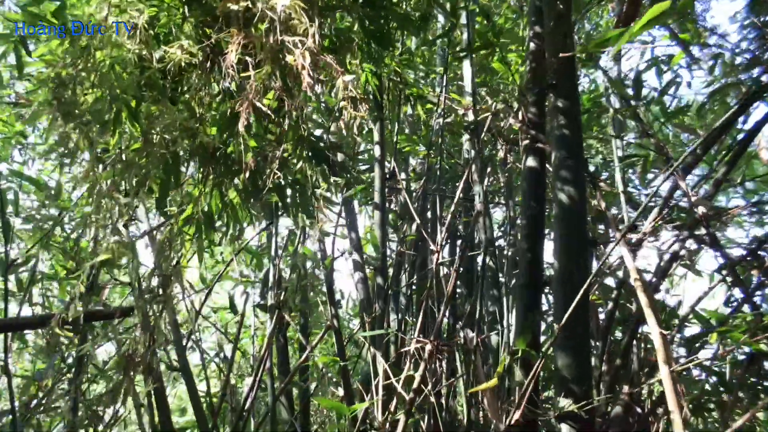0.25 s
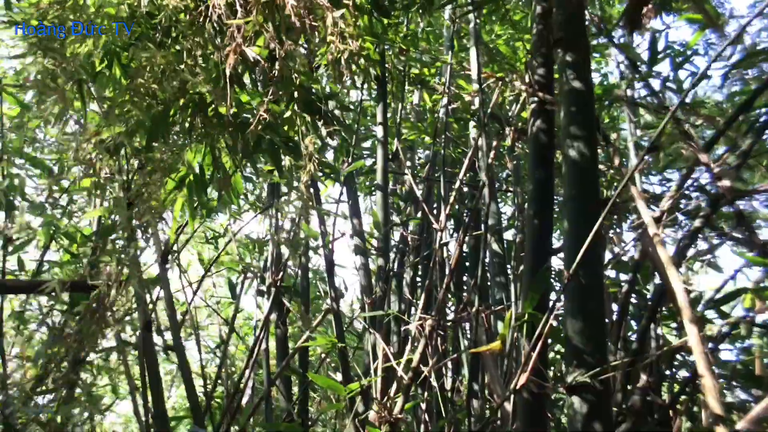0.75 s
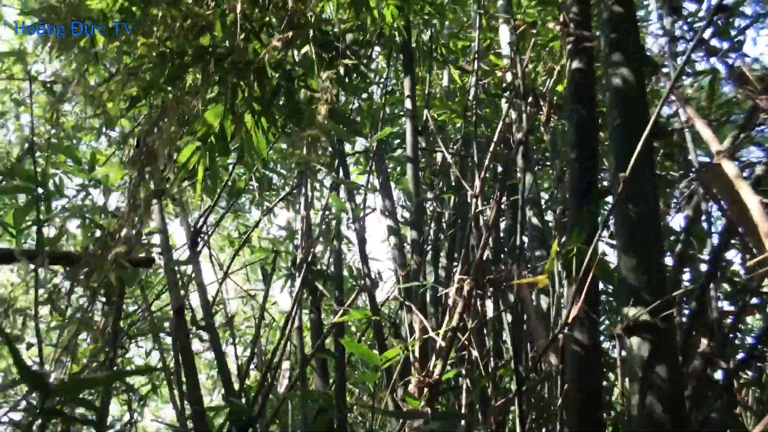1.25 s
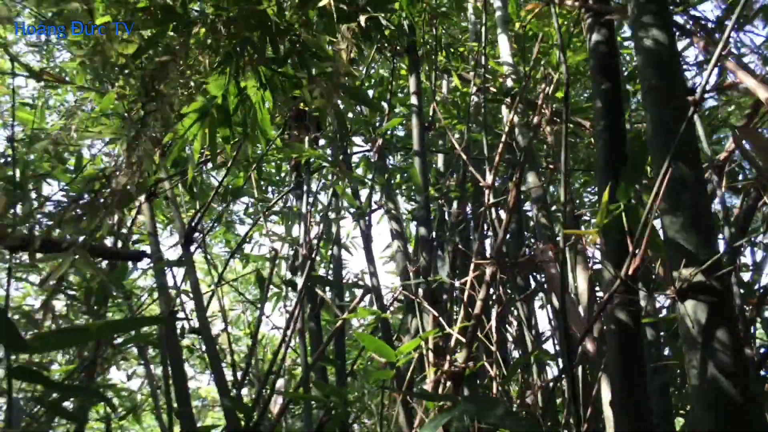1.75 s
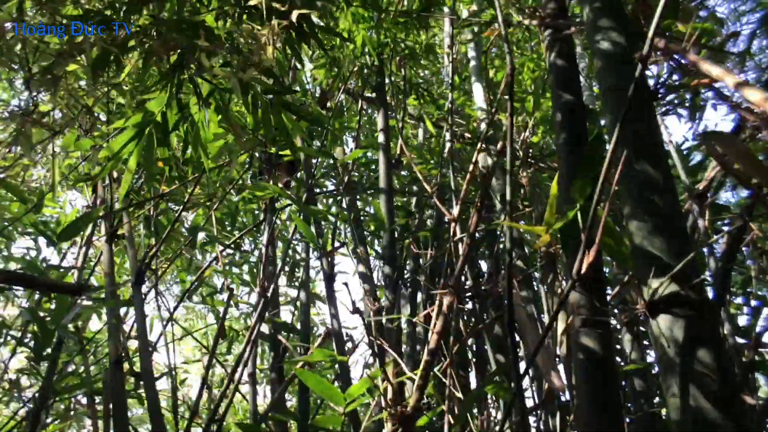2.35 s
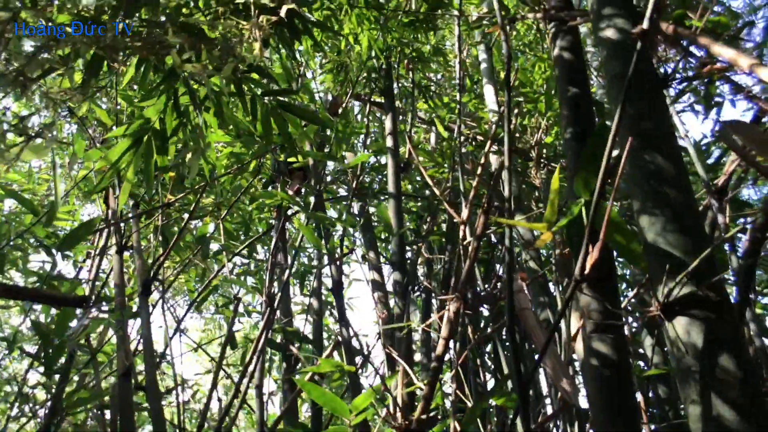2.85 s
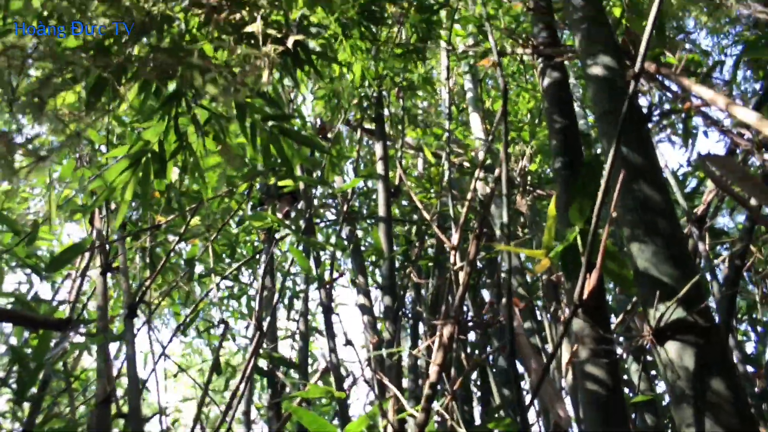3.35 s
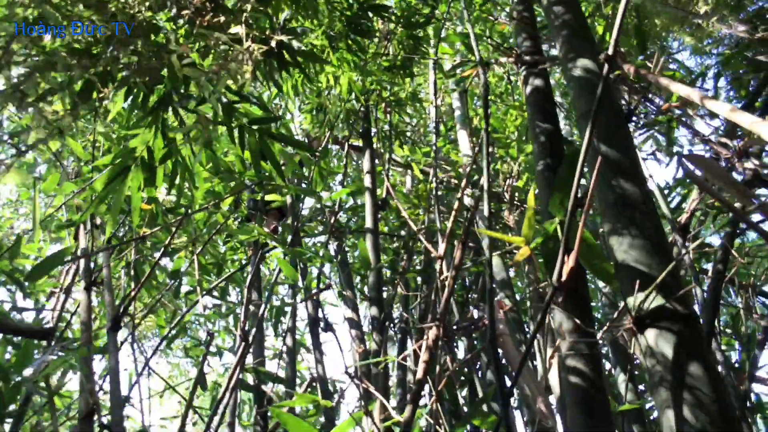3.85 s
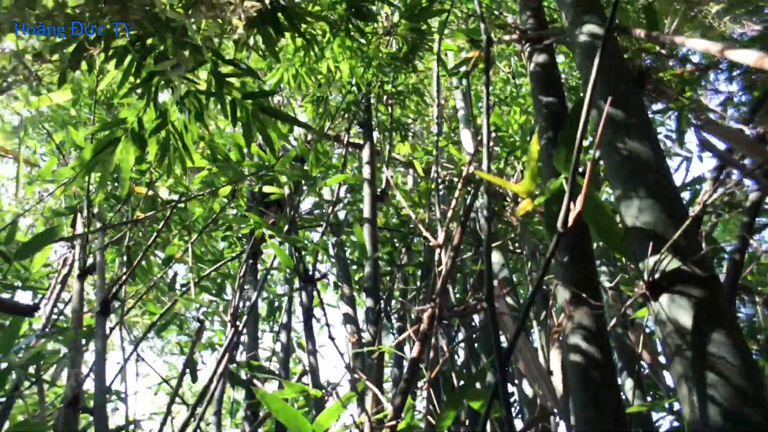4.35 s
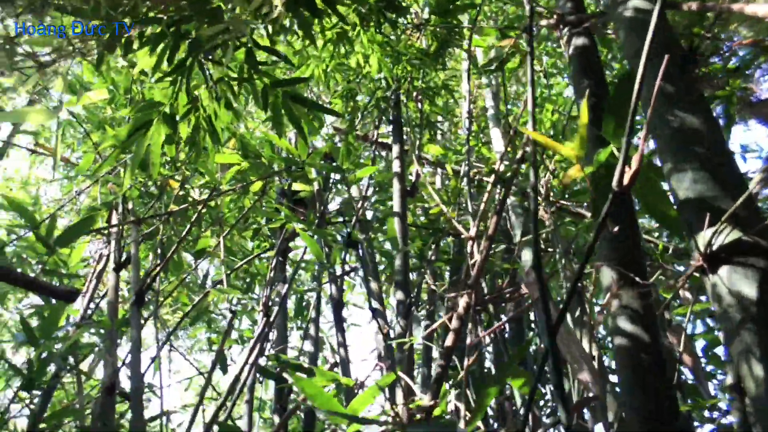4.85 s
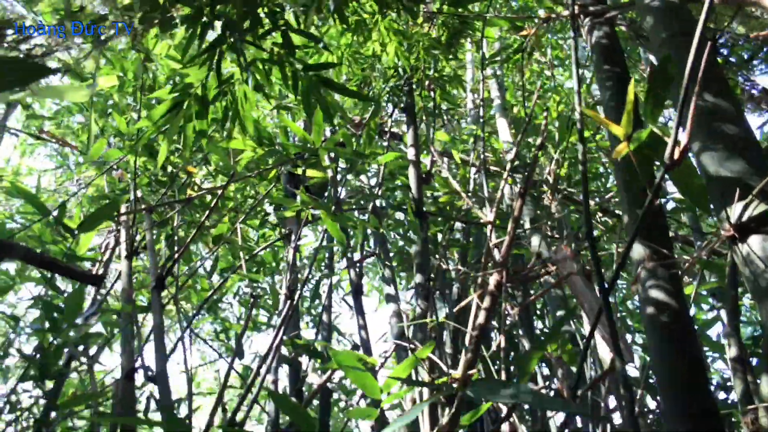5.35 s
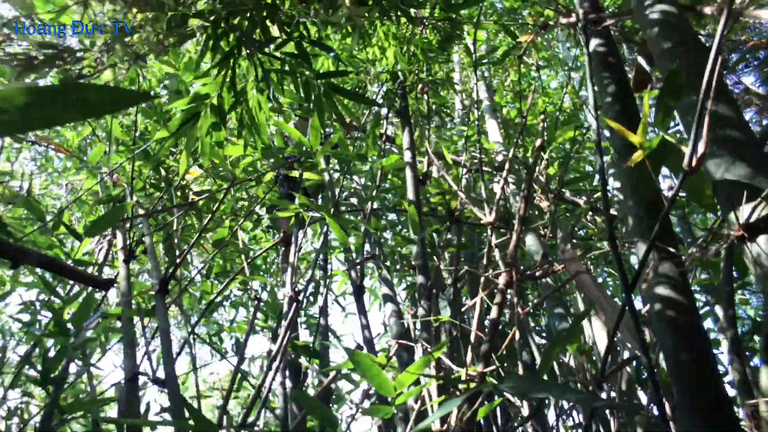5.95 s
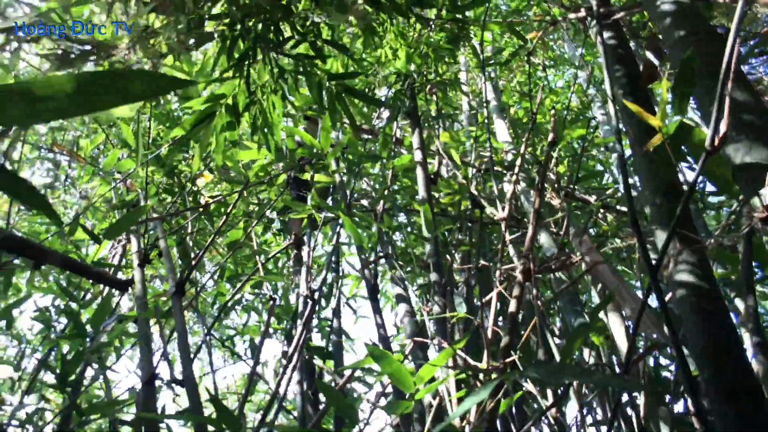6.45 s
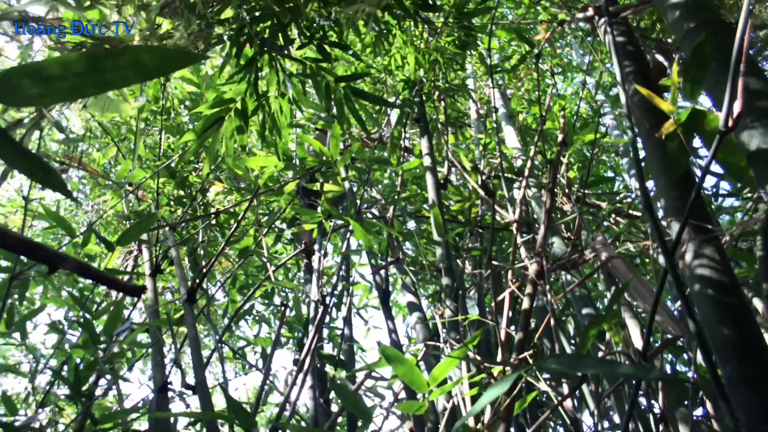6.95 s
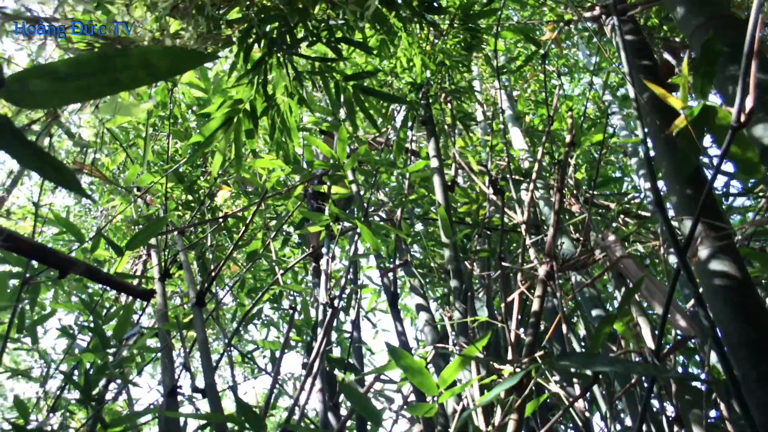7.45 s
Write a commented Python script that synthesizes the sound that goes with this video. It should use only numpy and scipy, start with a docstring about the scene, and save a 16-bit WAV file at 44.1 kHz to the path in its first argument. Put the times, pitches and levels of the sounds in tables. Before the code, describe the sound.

A saw scrapes back and forth through hollow bamboo, its teeth chattering, fibres hissing and blade ringing. Several dry twig cracks come in the first second and a half, with leaf rustles through the first four seconds. Later the sawing gets faster, deeper and more urgent, cutting off mid-action. Outdoors among stems, close mono microphone, short scattered echo, soft bumps and steady faint high insects underneath.

```python
"""Hand saw in a bamboo grove

A hand saw cuts a standing bamboo stem, four strokes a second, then nearly seven as the cut deepens.
Tooth impacts and tearing noise excite the wall, the blade and the hollow stem. Crackling noise makes
the dry leaves, short noise bursts the snapping twigs, a woody tap and soft bumps. Insects keep up a
thin high drone of narrow-band noise over faint air. All is mono, with a short echo on saw and twigs.
"""
import sys
import numpy as np
from scipy import signal
from scipy.fft import rfft, irfft, next_fast_len
from scipy.io import wavfile
from scipy.ndimage import map_coordinates

SR = 44100
rng = np.random.default_rng(int(sys.argv[2]) if len(sys.argv) > 2 else 0)


def store_wav(level_fs):
    """Save 16-bit WAV to argv[1]."""
    pcm = np.round(np.clip(np.atleast_2d(level_fs), -1, 1) * 32767)
    wavfile.write(sys.argv[1], SR, pcm.T.astype(np.int16))


N = 339129  # samples

# Distant moving air. Each row: frequency in Hz, gain in dB.
AIR_CURVE = [(20, -13.5), (60, -0.5), (120, -6), (350, 2.5), (3200, -7.5), (3800, -9)]
# Tone of dry leaves and twigs. Each row: frequency in Hz, gain in dB.
FOLIAGE_CURVE = [(150, -12), (500, -10.5), (2200, -2.5), (3250, 7), (3780, -11.5), (4500, -4.5),
                 (6200, 3.5), (8600, 2.5), (9700, -1.5), (10500, -13), (11600, -23.5), (13000, -2.5),
                 (15700, -11)]
# Steady stir of leaves on the sawn stem. Each row: time in seconds, level in dB.
LEAF_STIR = [(0, -44), (1.85, -43.5), (2.2, -48), (2.7, -51), (4.1, -49), (5.4, -49.5), (7.69, -47)]
# Dry leaves brushing. Each row: start in seconds, length before the fade in seconds, level in dB.
LEAF_BRUSHES = [(0.373, 0.23, -35.5), (1.19, 0.27, -30.5), (1.513, 0.22, -44), (1.953, .13, -39.5),
                (2.467, 0.038, -43), (2.863, 0.18, -37.5), (3.188, 0.12, -41), (3.435, 0.12, -44),
                (3.869, 0.12, -34.5)]
# Soft low bumps. Each row: start in seconds, level in dB.
SOFT_BUMPS = [(1.21, -58), (1.35, -55), (1.55, -53), (2.171, -57), (5.824, -53), (5.947, -53), (7.637, -55)]
# Twigs snapping. Each row: start in seconds, dry peak in dB, lift of the twig resonance in dB,
# time for the splintering to fall by 60 dB in seconds.
TWIG_SNAPS = [(0.3121, -13.5, 0, 0.12), (0.373, -10, 23, 0.072), (0.4047, -19, 11, 0.027),
              (0.8396, -13, 10.5, 0.063), (1.428, -13, -3, .015), (2.885, -36, 0, .06)]
# Saw strokes, cutting and return in turn. Each row: start in seconds, time to top speed in seconds,
# stroke level in dB before the pressing force scales it.
SAW_STROKES = [(.033, 0.084, -32.5), (.268, 0.18, -32), (.531, .088, -32.2), (.754, .115, -32),
               (.993, .11, -33.5), (1.197, 0.2, -34), (1.498, 0.081, -32.5), (1.752, 0.12, -34),
               (1.955, 0.079, -33.5), (2.197, 0.14, -30.5), (2.44, 0.095, -33), (2.681, 0.14, -34.5),
               (2.891, 0.11, -34), (3.156, .112, -32), (3.38, 0.098, -34.5), (3.611, 0.14, -32),
               (3.844, 0.099, -31.5), (4.095, .12, -32.5), (4.323, 0.09, -32.5), (4.541, 0.11, -31.5),
               (4.756, 0.098, -30.5), (4.977, 0.12, -29), (5.187, 0.095, -31.5), (5.388, 0.12, -32.5),
               (5.566, 0.08, -31), (5.742, .105, -31.5), (5.905, 0.078, -32), (6.048, 0.077, -32.5),
               (6.196, 0.087, -30.5), (6.346, 0.089, -33.5), (6.493, 0.075, -31), (6.645, 0.11, -32),
               (6.801, 0.073, -31), (6.944, 0.12, -30.5), (7.102, 0.067, -31), (7.246, 0.11, -29),
               (7.406, 0.073, -30.5), (7.55, 0.083, -30.5)]
# The teeth dig in and chatter. Each row: time in seconds, extra impact in dB.
TOOTH_CHATTER = [(0.113, 12), (2.062, 5), (2.8, 9), (3.936, 14), (4.012, 12), (5.51, 12)]
# Tooth on stem wall. Each row: frequency in Hz, gain in dB.
RASP_CURVE = [(120, -33), (230, -15.5), (290, 1.5), (520, 0), (780, -1.5), (1200, 0.5), (2300, -2.5),
              (3200, 3), (3500, -2.5), (3750, -17), (5000, -24), (9000, -34)]
# Wall resonances. Each row: centre in Hz, width in Hz, lift in a shallow cut in dB, lift in a deep cut in dB.
WALL_MODES = [(463, 36, -1.5, 5), (657, 14, 3, -0.5), (1407, 110, -12, 4), (1430, 280, 9, -0.5),
              (1948, 91, 8, 2), (2530, 160, -2, 0), (2975, 340, -0.5, 2), (3330, 66, 3, 5)]
# Fibres tearing. Each row: frequency in Hz, gain in dB.
TEARING_CURVE = [(2500, -55), (3800, -4), (4200, -2), (6200, 4), (7600, 1.5), (8600, 4), (9800, -3.5),
                 (10500, -19.5), (11600, -32.5), (13000, -5.5), (15700, -6.5)]
# Boom of the hollow stem. Each row: time in seconds, level in dB, added to the boom offset of the stroke.
STEM_BOOM = [(0, -4), (1.45, 0.5), (1.8, -11.5), (2.4, -2), (3.3, -9.5), (3.65, -1.5), (4.7, -3.5),
             (6.2, -10.5), (7.6, -6)]
# The cut turns from shallow to deep. Columns: start in seconds, end in seconds.
DEEPENING_SPAN = [3.2, 5.8]
# How the teeth bite, by direction and depth of cut. Columns: boom offset in dB, blade ring level in dB,
# hiss level in dB, swell exponent (no unit) before the stroke's haste scales it.
SHALLOW_CUT_BITE = (-2.5, -14.5, -9.5, 1.45)
DEEP_CUT_BITE = (-0.5, -12.5, -6.5, 1.7)
SHALLOW_RETURN_BITE = (-2, -9.5, -10.5, 2)
DEEP_RETURN_BITE = (-3.5, -6.5, -10.5, 1.4)

LAST_TURN_S = 7.71  # end of the last stroke
BRUSH_ATTACK_S, BRUSH_RELEASE_S = 0.029, 0.061  # linear rise, exponential fade constant
EASY_STROKE_S, EASY_TEETH_PER_S = 0.225, 354  # an unhurried stroke and its top tooth rate
# powers of the stroke's relative length: short strokes are faster and more evenly pressed
HURRY_TEETH, HURRY_SWELL = 0.72, 1.32
RING_SHALLOW_HZ, RING_DEEP_HZ = 1035, 928  # the blade's ring in mid-stroke
RING_SLIDE = 0.051  # share by which the ring starts higher and ends lower
BITE_DB, BITE_S = 1, 0.033  # harder catch around top speed in a shallow cut: extra level, half width
BREAK_LOOSE_S = 0.024  # moment of the jerk within a deep cutting stroke
TOP_HZ = 15750  # upper band limit


def amp(db):
    """Decibels to gain."""
    return 10 ** (np.asarray(db) / 20)


def rms(x):
    """Root mean square."""
    return np.sqrt(np.mean(x ** 2) + 1e-20)


def unit(x):
    """x at rms 1."""
    return x / rms(x)


def blend(first, second, share):
    """From the first value to the second as share goes from 0 to 1."""
    return np.asarray(first) * (1 - share) + np.asarray(second) * share


def along(points, hz):
    """Read a curve of (Hz, value) points on a log frequency axis."""
    f, v = np.transpose(points)
    return np.interp(np.log(hz + 1), np.log(f), v)


def over_time(points, s):
    """Read a curve of (seconds, value) points."""
    return np.interp(s, *np.transpose(points))


def bell(hz, centre_hz, width_hz):
    """Power shape of one resonance, 1 at its centre."""
    return 1 / (1 + (2 * (hz - centre_hz) / width_hz) ** 2)


def wobble(rate, size):
    """A smooth random curve, rate knots a second."""
    knots = rng.standard_normal(int(size * rate / SR) + 4)
    return map_coordinates(knots, [np.arange(size) * rate / SR])


def colour(x, gain_db):
    """Causal (minimum-phase) filter with a gain in dB given as a function of Hz."""
    m = 2 * next_fast_len(len(x) // 2 + SR // 10)
    gain = amp(gain_db(np.fft.rfftfreq(m, 1 / SR)))
    cepstrum = irfft(np.log(gain + 1e-6))
    # folding the cepstrum forward in time makes the phase minimal
    cepstrum[1:m // 2] *= 2
    cepstrum[m // 2 + 1:] = 0
    return irfft(rfft(x, m) * np.exp(rfft(cepstrum)), m)[:len(x)]


def resonate(x, centre_hz, width_hz):
    """One damped mode."""
    return signal.lfilter(*signal.iirpeak(centre_hz, centre_hz / width_hz, SR), x)


def decaying_noise(t, t60):
    """Noise that falls by 60 dB in t60 seconds."""
    return rng.standard_normal(len(t)) * amp(-60 * t / t60)


def add(track, s, x):
    """Mix x into the track from time s."""
    part = track[round(s * SR):][:len(x)]
    part += x[:len(part)]


def grit(size, spread_db):
    """Noise made of tiny fractures of uneven size."""
    return unit(rng.standard_normal(size) * amp(spread_db * wobble(1500, size)))


def grove():
    """Insects drone in a narrow high band over faint moving air."""
    insect_curve = [(7200, -55), (7900, -10.5), (8350, -2), (8650, -4.5), (9100, -36)]  # Hz, dB
    drone = colour(rng.standard_normal(N), lambda hz: along(insect_curve, hz))
    air = colour(rng.standard_normal(N), lambda hz: along(AIR_CURVE, hz))
    drone_level = amp(-47.5 + 0.27 * wobble(22.0, N))
    return drone_level * unit(drone) + amp(-50) * unit(air)


def leaves():
    """Dry leaves slide in a dense crackle: a steady stir, and brushes that rise, hold and fade."""
    t = np.arange(N) / SR
    power = amp(over_time(LEAF_STIR, t)) ** 2
    for s, length, db in LEAF_BRUSHES:
        rise = np.clip((t - s) / BRUSH_ATTACK_S, 0, 1)
        fade = np.exp(-np.maximum(t - s - length, 0) / BRUSH_RELEASE_S)
        power = power + (amp(db) * rise * fade) ** 2
    crackle = grit(N, spread_db=2) * amp(1.7 * wobble(60, N))
    return np.sqrt(power) * unit(colour(crackle, lambda hz: along(FOLIAGE_CURVE, hz)))


def bumps():
    """Dull thuds of low noise swell fast and die away in about a tenth of a second."""
    track, t = np.zeros(N), np.arange(SR // 2) / SR
    age = t / 0.019  # 1 at the peak of the swell
    thud_curve = [(20, -5), (55, 6), (180, -17), (1500, -54)]  # Hz, dB
    for s, db in SOFT_BUMPS:
        thud = colour(rng.standard_normal(len(t)), lambda hz: along(thud_curve, hz))
        add(track, s, amp(db) * unit(thud) * age * np.exp(1 - age))
    return track


def knock():
    """One light woody tap: a decaying noise burst coloured by low wood resonances."""
    track, t = np.zeros(N), np.arange(SR // 10) / SR
    wood_curve = [(150, -2), (330, -18), (620, 0), (950, -32), (3000, -50)]  # Hz, dB
    tap = decaying_noise(t, t60=0.066)
    add(track, 2.173, amp(-53.5) * unit(colour(tap, lambda hz: along(wood_curve, hz))))
    return track


def twigs():
    """A sharp crack, then a short splintering, shaped by the twig's resonance."""
    track, t = np.zeros(N), np.arange(SR // 10) / SR
    for s, db, ring_db, t60 in TWIG_SNAPS:
        crack = amp(-60 * t / 0.0021)
        splintering = 0.33 * amp(-60 * t / t60)
        burst = rng.standard_normal(len(t)) * (crack + splintering)
        snap = colour(burst, lambda hz: along(FOLIAGE_CURVE, hz) + ring_db * bell(hz, 4800, 1500))
        add(track, s, amp(db) * snap / np.abs(snap).max())
    return track


def stems(x, t60, wet_db):
    """The surrounding stems scatter a short, weak echo."""
    t = np.arange(SR // 2) / SR
    tail = decaying_noise(t, t60) * (1 - np.exp(-t / 0.0009))
    return x + amp(wet_db) * signal.fftconvolve(x, tail / np.linalg.norm(tail))[:N]


def cut_depth(s):
    """0 while the cut is shallow, 1 once it is deep."""
    return np.interp(s, DEEPENING_SPAN, [0, 1])


def manner(length, depth, cutting):
    """A stroke's bite follows from its direction, its haste and the depth of the cut."""
    if cutting:
        shallow, deep = SHALLOW_CUT_BITE, DEEP_CUT_BITE
    else:
        shallow, deep = SHALLOW_RETURN_BITE, DEEP_RETURN_BITE
    boom_db, ring_db, hiss_db, swell = blend(shallow, deep, depth ** 2.4)
    ease = length / EASY_STROKE_S
    top_rate = EASY_TEETH_PER_S / min(ease, 1) ** HURRY_TEETH
    return swell * ease ** HURRY_SWELL, top_rate, boom_db, ring_db, hiss_db


def teeth(rate, jitter, spread_db):
    """Tooth impacts at a changing rate, and the share of each tooth's passage that has gone by."""
    phase = np.cumsum(rate * (1 + jitter * wobble(200, len(rate)))) / SR
    strikes = np.diff(np.floor(phase), prepend=0)
    return unit(strikes * amp(spread_db * rng.standard_normal(len(rate)))), phase % 1


def wall_rasp(drive, depth, ring_hz):
    """The stem wall answers the teeth with resonances that change as the cut deepens."""
    def wall_db(hz):
        gain = along(RASP_CURVE, hz) + 4 * bell(hz, ring_hz, 320)
        for centre, width, shallow, deep in WALL_MODES:
            gain = gain + (shallow + depth * (deep - shallow)) * bell(hz, centre, width)
        return gain
    return colour(ringing(drive, t60=0.028, share=0.63), wall_db)


def ringing(x, t60, share):
    """Many close, quickly dying modes; they differ with every new position of the blade."""
    t = np.arange(SR // 12) / SR
    tail = decaying_noise(t, t60)
    return x + share * signal.fftconvolve(x, tail / np.linalg.norm(tail))[:len(x)]


def blade_ring(drive, progress, ring_hz):
    """The blade rings through two damped modes, fading from the higher tuning to the lower."""
    def tuned(hz):
        return resonate(resonate(drive, hz, 111), hz, 580)
    early = tuned(ring_hz * (1 + RING_SLIDE))
    late = tuned(ring_hz * (1 - RING_SLIDE))
    return blend(early, late, np.minimum(progress, 1))


def stem_boom(drive):
    """The hollow stem booms whenever the tooth rate, or a multiple of it, meets its resonance."""
    return resonate(resonate(drive, 340.7, 23), 388, 160)


def fibre_hiss(drive, depth):
    """Tearing fibres hiss in the treble, with a narrow peak that grows with depth."""
    return colour(drive, lambda hz: along(TEARING_CURVE, hz) + 5 * depth * bell(hz, 6330, 160))


def stroke(start, length, rise, cutting):
    """One pass of the blade: it speeds up from rest and stops again, and every tooth bites in turn."""
    t = np.arange(int((length + 0.06) * SR)) / SR  # with room for the ring-out
    depth = cut_depth(start)
    swell, top_rate, boom_db, ring_db, hiss_db = manner(length, depth, cutting)
    ring_hz = blend(RING_SHALLOW_HZ, RING_DEEP_HZ, depth)
    speed = np.abs(np.sin(np.interp(t, [0, min(rise, length), length], [0, np.pi / 2, np.pi])))

    # in a deep kerf the blade drags for a moment; a cutting stroke then breaks loose with a jerk
    loose = t - BREAK_LOOSE_S
    jerk = 0.83 * depth ** 3 * cutting * (loose > 0) * np.exp(-np.abs(loose) / 0.018)
    held = 1 - 0.12 * depth ** 2 * (loose < 0)
    catch_db = BITE_DB * (1 - depth ** 2) * np.exp(-((t - rise) / BITE_S) ** 2)
    pressure = speed ** swell + jerk + 0.02 * (t < length)
    force = held * pressure * amp(catch_db + 1.22 * wobble(44.7, len(t)))

    tooth_rate = top_rate * np.maximum(speed, jerk) ** 0.9
    impacts, passage = teeth(tooth_rate, jitter=0.025, spread_db=4.5)
    dig_db = sum(db * np.exp(-((start + t - s) / 0.0076) ** 2) for s, db in TOOTH_CHATTER)
    # fibres tear most just after each bite
    tearing = unit(grit(len(t), spread_db=2.0) * (np.exp(-passage / 1.5) + 0.54))
    bites = 0.36 * amp(dig_db) * impacts + tearing

    rasp = wall_rasp(force * bites, depth, ring_hz)
    # the blade rings even under a light touch, which eases by 9 dB along the stroke
    touch = held * speed * amp(-9 * t / length)
    ring = blade_ring(touch * bites, t / length, ring_hz)
    # a shallow cut passes on only the fastest part of the stroke
    push = force ** 1.66 * (speed + 0.01) ** (0.61 * (1 - depth))
    boom = stem_boom(push * (impacts + 0.19 * tearing))
    hiss = fibre_hiss(speed ** 1.64 * tearing, depth)

    boom_db = boom_db + over_time(STEM_BOOM, start)
    layers = [(rasp, -0.8), (ring, ring_db), (boom, boom_db), (hiss, hiss_db)]
    return rms(force) * sum(amp(db) * unit(layer) for layer, db in layers)


def saw():
    """Cutting strokes and return strokes alternate without a pause."""
    track = np.zeros(N)
    turns = [row[0] for row in SAW_STROKES] + [LAST_TURN_S]
    for k, (s, rise, db) in enumerate(SAW_STROKES):
        one_pass = stroke(s, turns[k + 1] - s, rise, cutting=k % 2 == 0)
        add(track, s, amp(db) * one_pass)
    return track


def scene():
    """Everything reaches one microphone, heard alike in both channels; saw and twigs echo."""
    close = stems(saw() + twigs(), t60=0.31, wet_db=-11)
    mono = close + leaves() + bumps() + knock() + grove()
    return np.array([mono, mono])


def record(dry):
    """A steep low-pass removes everything from the band limit up."""
    m = next_fast_len(N + SR // 10)
    passed = np.fft.rfftfreq(m, 1 / SR) < TOP_HZ
    return irfft(rfft(dry, m) * passed, m)[:, :N]


dry = scene()
out = record(dry)
store_wav(out)
```